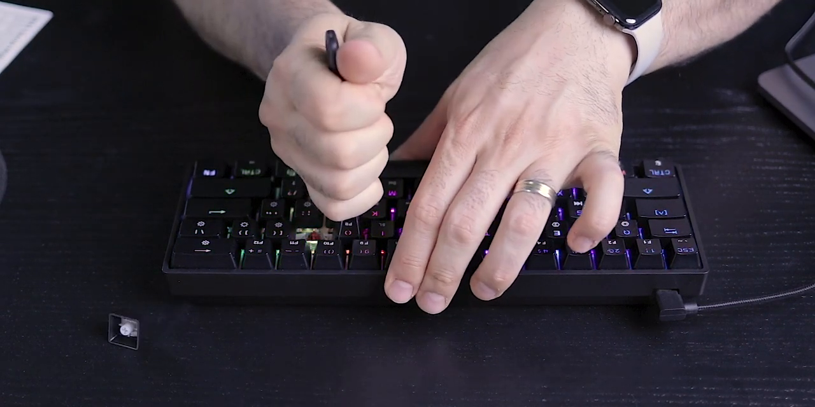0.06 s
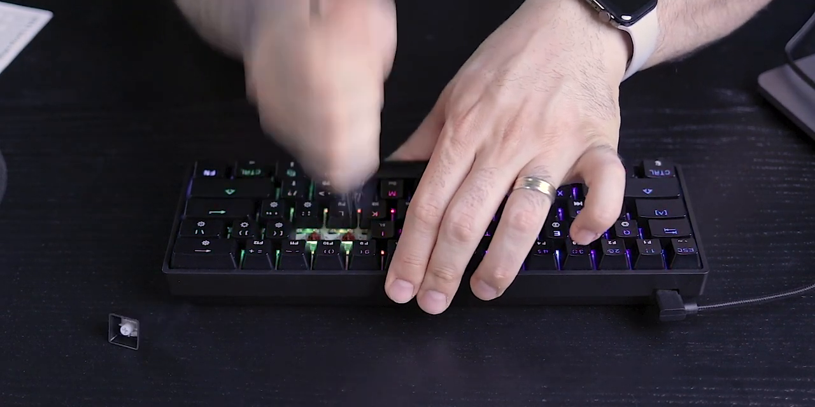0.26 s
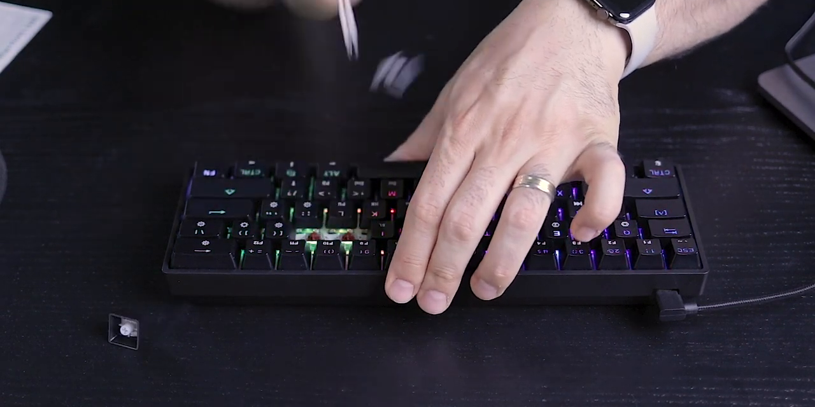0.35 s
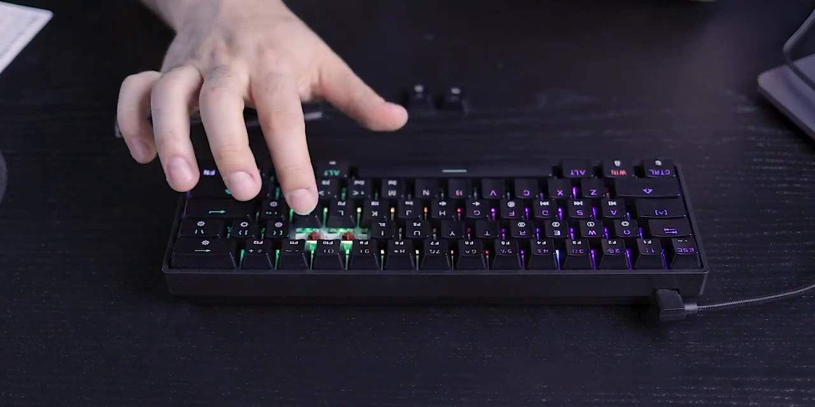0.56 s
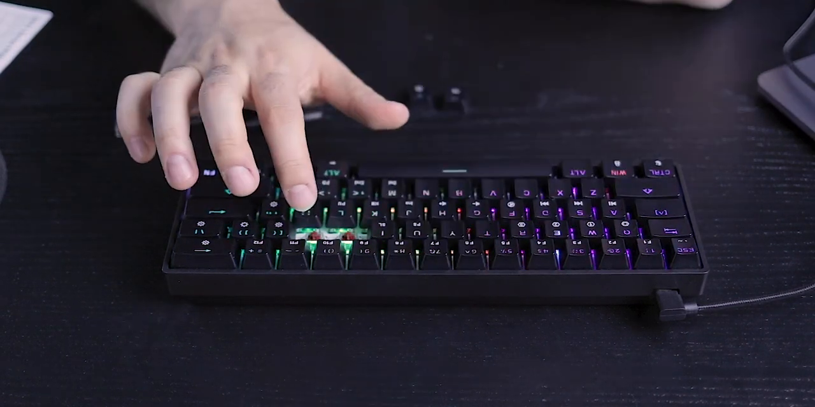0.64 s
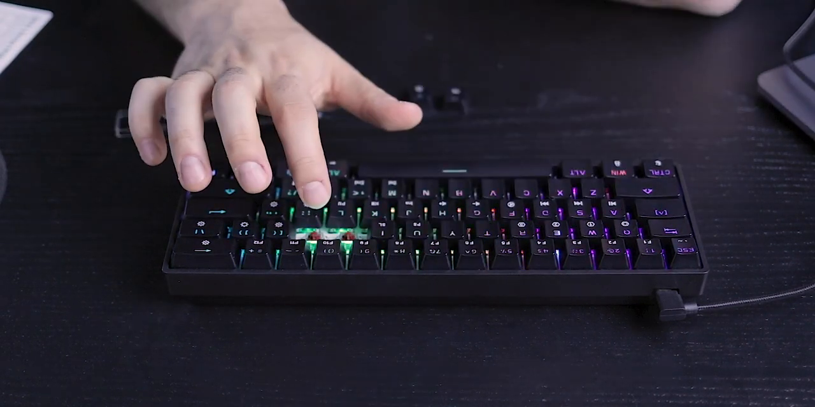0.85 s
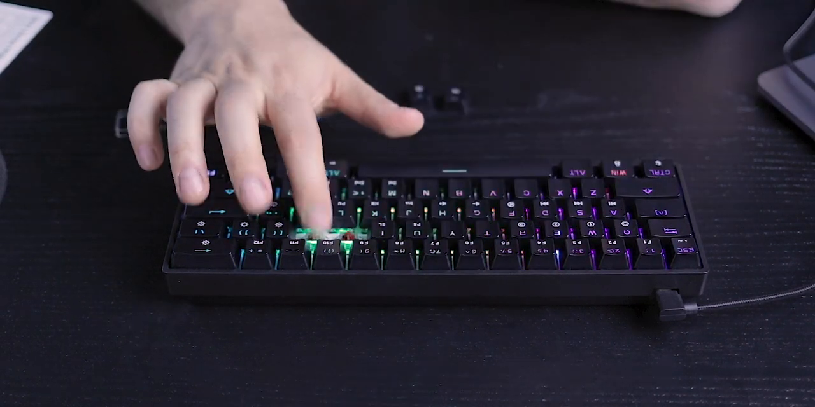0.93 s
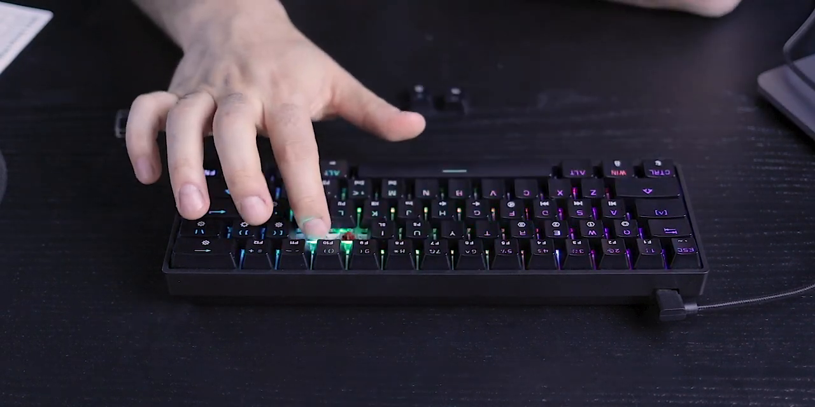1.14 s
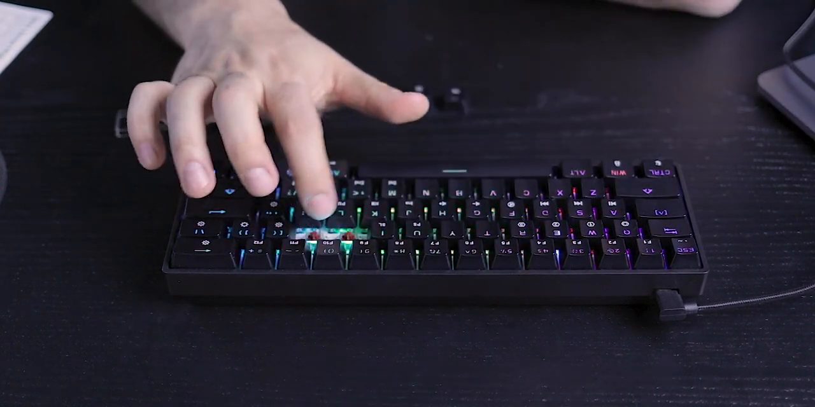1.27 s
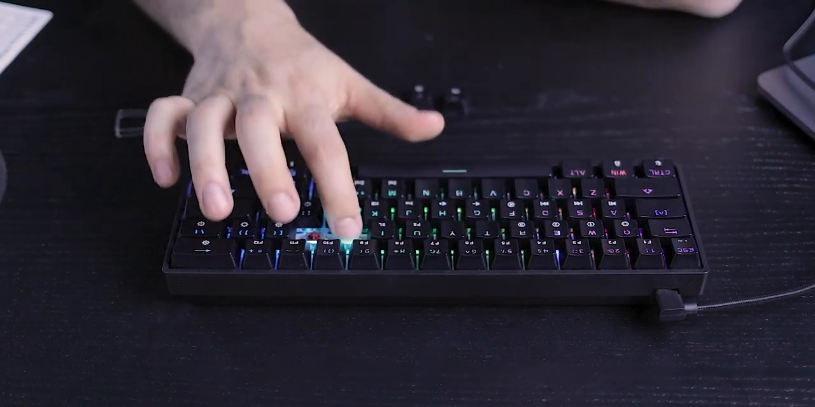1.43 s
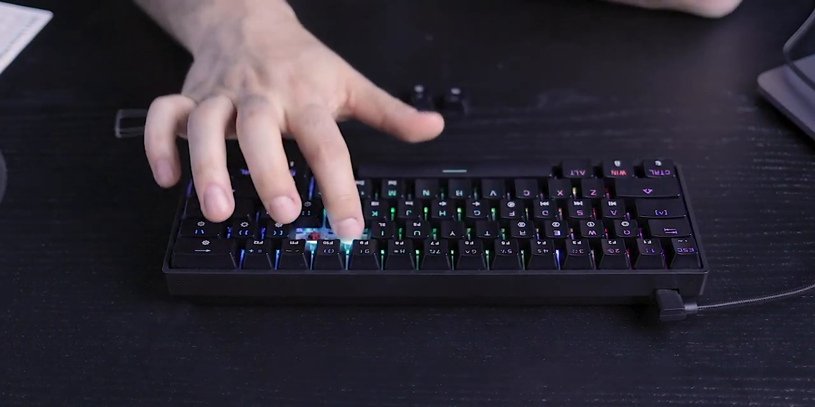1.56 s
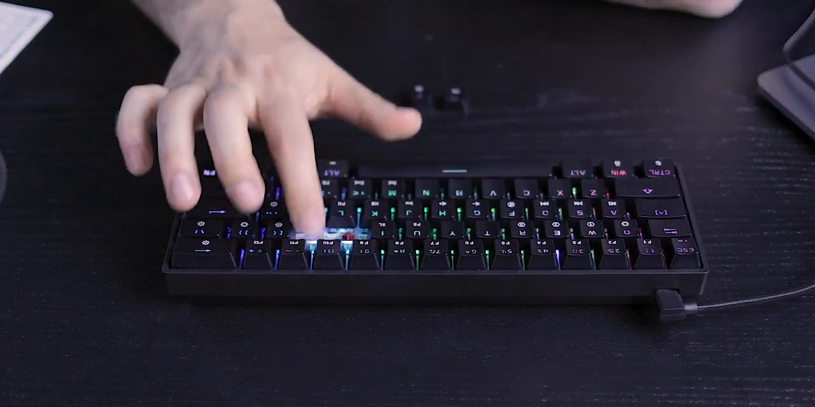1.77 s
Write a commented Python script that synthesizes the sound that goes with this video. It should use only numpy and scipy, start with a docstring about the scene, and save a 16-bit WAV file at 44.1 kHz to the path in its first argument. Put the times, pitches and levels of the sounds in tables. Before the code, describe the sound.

A plastic part knocks and snaps sharply out of a mechanical keyboard. The desk thumps and something rocks faintly, then a finger presses a bare switch four times with lighter clicks, close up in a small room.

```python
"""A desk in a small room, close up: a puller strains at a mechanical keyboard, the part gives with a knock
and snaps free. The desk sways, something rocks faintly and a hand lands. A finger then works a bare
switch four times: a tick going down, a thud through the case at the bottom, a brighter click as the stem
springs back. Each click is a few milliseconds of chatter coloured by the body it strikes; the case,
the desk and the steel puller ring on as damped modes."""
import sys
import numpy as np
from scipy import signal
from scipy.fft import rfft, irfft, next_fast_len
from scipy.io import wavfile

SR = 44100
rng = np.random.default_rng(int(sys.argv[2]) if len(sys.argv) > 2 else 0)


def transcribe(u):
    """Save the signal u as a 16-bit wav file named by the first command-line argument.

    u: samples, shape (n,) or (channels, n), limited to [-1, 1]; the rate is SR.
    q: integer samples, one column per channel.
    """
    v = np.clip(np.atleast_2d(u).T, -1, 1)
    q = np.round(v * 32767).astype(np.int16)
    wavfile.write(sys.argv[1], SR, q)


N = 79380

# Tone colours. Each row: frequency in Hz, relative gain in dB.
ROOM_COLOUR = [(4000, -6.5), (6500, -10.5), (13000, -12.5)]  # the room's tail
GRIP_COLOUR = [(25, -3.5), (60, -8.5), (220, -6), (450, -21), (3200, -33.5), (14000, -69)]  # skin on the puller
BRUSH_COLOUR = [(650, 13), (2000, -4.5), (3800, -4), (9000, -37.5)]  # the brushing hand
SHUDDER_COLOUR = [(25, -9), (70, 6.5), (150, 7), (330, -9.5), (600, -46), (3000, -100)]  # the desk's dull shudder
GIVE_COLOUR = [(59, -25), (100, 8), (818, -8.5), (1280, -4), (2270, -22.5), (3860, -19), (8460, -38.5),
               (12100, -31.5), (16000, -53)]  # the knock as the part gives
SNAP_COLOUR = [(200, 3), (680, -14), (940, -0.5), (1200, -5.5), (1500, -4), (2100, -3.5), (3150, -0.5),
               (3700, -5), (4500, -0.5), (5600, -7), (6400, -2), (7600, -8.5), (8900, -1.5), (11000, -7.5),
               (15500, -10.5)]  # the plastic clip letting go
STEM_COLOUR = [(750, -25), (1000, -3.5), (2000, -10), (4500, 2), (8400, -9), (9800, -5), (11000, -15),
               (13000, -11.5), (16000, -21)]  # the stem's tick
PLATE_COLOUR = [(180, -17.5), (300, -3), (500, -25), (740, -27.5), (880, -2), (1400, 0.5), (2000, -6.5),
                (4500, -12.5), (16000, -52)]  # the plate under the switch
HOUSING_COLOUR = [(800, -25), (950, -29), (1330, -1.5), (1950, -20.5), (2700, 0), (3050, -8.5), (3450, 4),
                  (3950, -5), (4600, 3.5), (5050, -7.5), (5400, -3.5), (6000, -17.5), (7500, -9.5),
                  (11000, -25.5), (12750, -25), (14000, -29), (15000, -30), (16200, -41)]  # the top of the switch housing
ROOM_TONE_DB, ROOM_TONE_COLOUR = -72.5, [(25, -1), (200, -4), (500, -23), (1200, -26), (16000, -55)]

# Ringing bodies. Each row: frequency in Hz, relative level in dB, t60 in seconds.
DESK_MODES = [(117.7, -4, .35), (140, -3, 0.32), (196.7, 1.5, 0.15), (250, -4.5, 0.24), (315, -12.5, .22)]
FRAME_MODES = [(26, -30, .8), (51, -37, 0.26), (56.8, -28, 0.63)]
CASE_MODES = [(183.7, -5, 0.16), (299.3, -10, 0.13), (470.3, -21, .27), (681.3, -12, .07),
              (957, -8.5, 0.044), (1123, -14, .1), (1284.3, -9, 0.052)]
PULLER_MODES = [(1420, -24, 0.075), (3177, -30, 0.13)]

# The room's decay. Each row: frequency in Hz, t60 in seconds.
ROOM_T60 = [(150, .54), (1000, .36), (4000, .29), (8000, .24), (15000, .17)]
# The grip slips. Each row: start in seconds, level in dB, length in seconds.
GRIP_SLIPS = [(0.038, -41, 0.0072), (0.091, -57, 0.0048)]
# Something small rocks to rest. Each row: start in seconds, level in dB.
ROCKS = [(.546, -53.5), (.602, -57), (.660, -56.5), (.722, -60), (.778, -60), (0.829, -57.5), (0.897, -68)]
# Its hollow body. Each row: centre in Hz, width in Hz, relative gain in dB.
ROCK_BODY = [(188, 69, 2.5), (484, 105, 3), (800, 67, -9), (1104, 54, -0.5), (1263, 65, -2)]
# Pushes into the desk. Each row: start in seconds, level in dB, pitch in Hz, rise in seconds,
# desk ring in dB relative to the push.
DESK_PUSHES = [(.231, -21, 139.7, 0.021, -28), (0.309, -22, 148.5, 0.01, -8.5),
               (0.656, -27.5, 189.5, 0.01, -5), (0.658, -44, 431, 0.0053, -33.5),
               (1.006, -43, 101, 0.02, -30), (1.183, -37, 268, 0.0067, -11.5),
               (1.46, -20.5, 126, 0.0064, -15), (1.603, -27.5, 111, 0.011, -12)]
# Ticks of the stem going down. Each row: start in seconds, level in dB, chatter length in seconds,
# leaf pitch in Hz, leaf ring in dB relative to the tick, upper ring in dB relative to the leaf pitch.
PRESSES = [(1.0112, -37.5, 0.0048, 5730, 0, -4.5), (1.1584, -41, 0.0043, 6430, -3.5, -20),
           (1.4509, -43, 0.0045, 4230, -3, -24), (1.4618, -36, 0.002207, 3890, 2, -32),
           (1.5924, -42.5, 0.005, 4260, 1, -1.5)]
# The stem lands on the plate. Each row: start in seconds, level in dB, length in seconds,
# drive into the case in dB.
LANDINGS = [(1.016, -45.5, .011, -35), (1.172, -49, 0.0071, -38.5), (1.463, -47.5, 0.008, -35),
            (1.605, -55, 0.011, -49.5)]
# The stem grazes its guide. Each row: start in seconds, level in dB, length in seconds.
TOUCHES = [(1.522, -57.5, 0.0015), (1.6766, -48, 0.00195)]
# The stem springs back. Each row: start in seconds, level in dB, chatter length in seconds,
# treble tilt in dB per octave.
RELEASES = [(1.0919, -28, 0.0024, 1.5), (1.2633, -27.5, 0.0023, 4), (1.5423, -27.5, 0.00155, 4),
            (1.6976, -25.5, 0.0019, 5.5)]

GIVE_S, SNAP_S = .2328, .3123  # the part gives, then comes free


def amp(db):
    """Decibels to gain."""
    return 10 ** (np.asarray(db) / 20)


def along(points, hz):
    """Reads a curve of (Hz, value) points on a log frequency axis."""
    point_hz, values = np.transpose(points)
    return np.interp(np.log(hz + 1), np.log(point_hz + 1), values)


def since(start):
    """Seconds after start, zero before it."""
    return np.maximum(np.arange(N) / SR - start, 0)


def grid():
    """The frequencies in Hz that all responses share."""
    return np.fft.rfftfreq(next_fast_len(2 * N, True) // 2 * 2, 1 / SR)


def filtered(x, response):
    """Plays x through a frequency response."""
    return irfft(rfft(x, 2 * len(response) - 2) * response)[:N]


def colour(points, tilt_db=0):
    """Minimum-phase response through (Hz, dB) points, tilted by tilt_db an octave in the treble."""
    hz = grid()
    gain_db = along(points, hz) + tilt_db * np.log2(1 + hz / 1000)
    cepstrum = irfft(np.log(amp(gain_db)))
    cepstrum[1:len(hz) - 1] *= 2
    cepstrum[len(hz):] = 0
    return np.exp(rfft(cepstrum))


def resonances(peaks):
    """Causal response of (Hz, width Hz, dB) resonances with steep skirts."""
    f = grid()
    return sum(amp(db) * (1j * f * width / (hz * hz - f * f + 1j * f * width)) ** 2
               for hz, width, db in peaks)


def noise(points):
    """Coloured noise of rms 1."""
    wash = filtered(rng.standard_normal(N), amp(along(points, grid())))
    return wash / wash.std()


def excite(force, body, db, length):
    """A force sounds a body, with the energy of a level of db held for length seconds."""
    sound = filtered(force, body)
    return amp(db) * sound * np.sqrt(length * SR / np.sum(sound ** 2))


def contact(start, db, length, body, attack, t60):
    """Surfaces rub or chatter: a noise force swells, holds and dies away in a body."""
    force = rng.standard_normal(N) * (1 - np.exp(-since(start) / attack))
    decay = amp(-60 * since(start + length) / t60)
    return excite(force * decay, body, db, length)


def click(start, db, length, body, t60=0.0036):
    """Hard parts chatter for a few milliseconds and excite a body."""
    t = np.arange(2048) / SR
    rise = 1 - np.exp(-t / (0.052 * length))
    gate = rise * amp(-60 * np.maximum(t - length, 0) / t60)
    burst = gate * rng.standard_normal(len(t))
    flattened = irfft(np.exp(1j * np.angle(rfft(burst))))  # evens the force across frequency
    force = np.pad(gate * flattened, (round(start * SR), 0))
    return excite(force, body, db, length)


def ring(start, modes, attack=0.0028):
    """Damped modes, struck once."""
    t = since(start)
    tones = sum(amp(db - 60 * t / t60) * np.sin(2 * np.pi * hz * t) for hz, db, t60 in modes)
    return (1 - np.exp(-t / attack)) * tones


def room(x, early_db, tail_db, early_t60=0.061, tail_rise_s=0.0011):
    """Adds quick scatter from case and desk top, and a room tail that darkens as it fades."""
    hz, frame_s, spectrum = signal.stft(rng.standard_normal(SR // 2), SR, nperseg=256)
    fade_db = along(ROOM_COLOUR, hz)[:, None] - 60 * frame_s / along(ROOM_T60, hz)[:, None]
    tail = signal.istft(spectrum * amp(fade_db), SR, nperseg=256)[1]
    t = np.arange(len(tail)) / SR
    tail *= 1 - np.exp(-(t / tail_rise_s) ** 2)
    early = rng.standard_normal(len(t)) * amp(-60 * t / early_t60) * (t > .002)
    reverb = amp(tail_db) * tail / np.linalg.norm(tail) + amp(early_db) * early / np.linalg.norm(early)
    return x + signal.fftconvolve(x, reverb)[:N]


def room_tone():
    """A faint, dark bed of steady noise."""
    return amp(ROOM_TONE_DB) * noise(ROOM_TONE_COLOUR)


def hands(grip_db=-50, fall_db_per_s=64):
    """Fingers settle and slip on the puller; later the hand brushes across."""
    skin = colour(GRIP_COLOUR, tilt_db=-4.5)
    grip = amp(grip_db - fall_db_per_s * since(0)) * noise(GRIP_COLOUR)
    slips = sum(contact(*slip, skin, attack=0.00038, t60=0.15) for slip in GRIP_SLIPS)
    brush = contact(start=0.478, db=-66, length=0.28, body=colour(BRUSH_COLOUR), attack=0.014, t60=0.17)
    return grip + slips + brush


def rocking():
    """A small loose thing rocks softly from side to side."""
    body = resonances(ROCK_BODY)
    taps = sum(click(start, db, length=0.0086, body=body, t60=0.044) for start, db in ROCKS)
    return room(taps, early_db=-13.5, tail_db=-11.5)


def desk(sway_stop_s=.53, shudder_db=-13):
    """The snap sways the frame; each push bends the desk, leaving it ringing and shuddering."""
    out = ring(SNAP_S, FRAME_MODES) * amp(-60 * since(sway_stop_s) / 0.038)
    top, dull = ring(0, DESK_MODES, attack=0.013), colour(SHUDDER_COLOUR)
    for start, db, hz, rise, ring_db in DESK_PUSHES:
        t = since(start)
        swell = (t / rise * np.exp(1 - t / rise)) ** 4
        push = swell * np.sin(2 * np.pi * hz * t)
        ringing = signal.fftconvolve(push, top)[:N]
        out += amp(db) * (push + amp(ring_db) * ringing / np.abs(ringing).max())
        out += contact(start + rise / 2, db + shudder_db, length=.025, body=dull, attack=0.0013, t60=0.23)
    return out


def case_rings(release_db=-16):
    """Each end of the stem's travel rings the keyboard case through the plate."""
    blows = [(start, db) for start, _, _, db in LANDINGS]
    blows += [(start, db + release_db) for start, db, _, _ in RELEASES]
    ringing = sum(amp(db) * ring(start, CASE_MODES) for start, db in blows)
    return filtered(ringing, colour(PLATE_COLOUR))


def presses(leaf_upper_hz=9550):
    """The stem ticks past the contact leaf, which rings briefly, then lands on the plate."""
    stem, plate = colour(STEM_COLOUR), colour(PLATE_COLOUR)
    ticks = 0
    for start, db, length, leaf_hz, ring_db, upper_db in PRESSES:
        leaf = resonances([(leaf_hz, 850, 0), (leaf_upper_hz, 800, upper_db)])
        tick = click(start, db, length, stem)
        ping = click(start, db + ring_db, length, leaf)
        ticks += room(tick + ping, early_db=-10, tail_db=-16.5)
    thuds = sum(contact(start, db, length, plate, attack=0.00047, t60=0.02)
                for start, db, length, _ in LANDINGS)
    return ticks + room(thuds, early_db=-7, tail_db=-10)


def releases(slide_s=0.0044, slide_db=-23.5):
    """The spring drives the stem up its guide and against the top of the housing."""
    clicks = 0
    for start, db, length, tilt_db in RELEASES:
        housing = colour(HOUSING_COLOUR, tilt_db)
        slide = click(start - slide_s, db + slide_db, slide_s, housing)
        strike = click(start, db, length, housing, t60=0.00086)
        clicks += room(slide + strike, early_db=-10, tail_db=-16)
    stem = colour(STEM_COLOUR)
    touches = sum(click(*touch, stem, t60=0.0067) for touch in TOUCHES)
    return clicks + room(touches, early_db=-5, tail_db=-10)


def part_gives():
    """The part yields to the puller with a dull knock that rings the case."""
    knock = click(GIVE_S, db=-15, length=0.0029, body=colour(GIVE_COLOUR), t60=0.0081)
    case = amp(-16) * ring(GIVE_S, CASE_MODES)
    return room(knock + case, early_db=-12, tail_db=-14)


def part_snaps(db=-9, chatter_s=0.0023, scrape_s=.004, rebound_s=0.0048):
    plastic = colour(SNAP_COLOUR)
    scrape = click(SNAP_S - scrape_s, db - 11.5, scrape_s, plastic)
    snap = click(SNAP_S, db, chatter_s, plastic, t60=0.0091)
    rebound = click(SNAP_S + rebound_s, db - 12, chatter_s / 2, plastic)
    # The room hears the snap from all sides, so a separate burst feeds the reverb.
    send = click(SNAP_S, db, chatter_s, plastic, t60=0.0057)
    reverb = room(send, early_db=-9.5, tail_db=-10.5) - send
    case = amp(-20) * ring(SNAP_S, CASE_MODES, attack=0.0018)
    return scrape + snap + rebound + reverb + case + ring(SNAP_S, PULLER_MODES)


def scene():
    """Switch, pull and handling in close mono, over a quiet room."""
    switch = presses() + releases() + case_rings()
    pull = part_gives() + part_snaps()
    return (switch + pull + desk() + rocking() + hands() + room_tone())[None]


def record(dry, top_hz=16400):
    """A steep low-pass trims the very top."""
    low_pass = 1 / np.sqrt(1 + (grid() / top_hz) ** 160)
    return filtered(dry[0], low_pass)[None]


dry = scene()
out = record(dry)
transcribe(out)
```